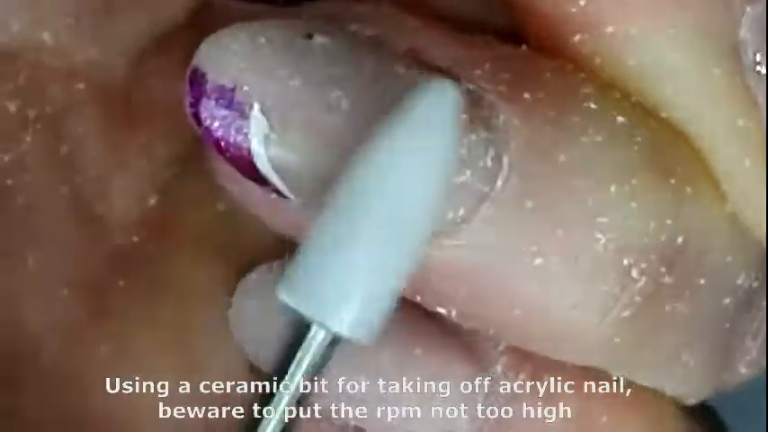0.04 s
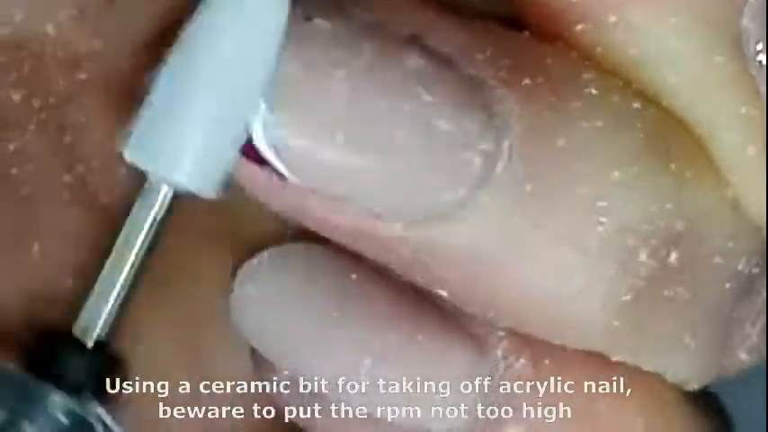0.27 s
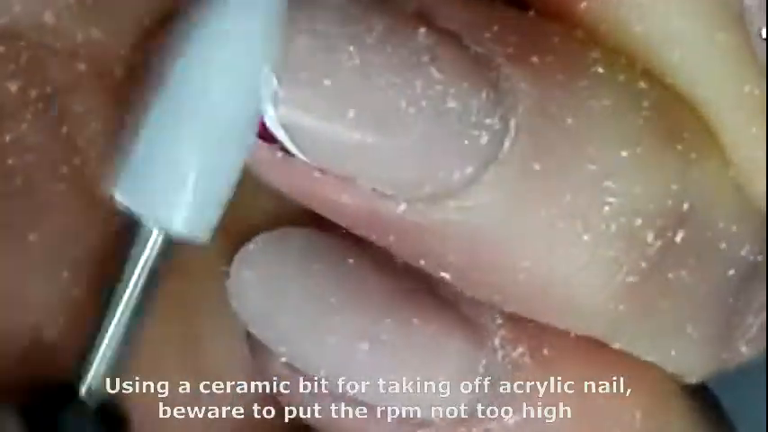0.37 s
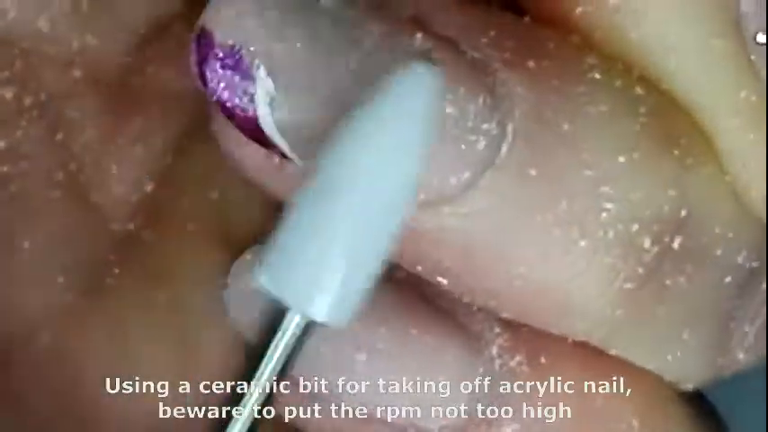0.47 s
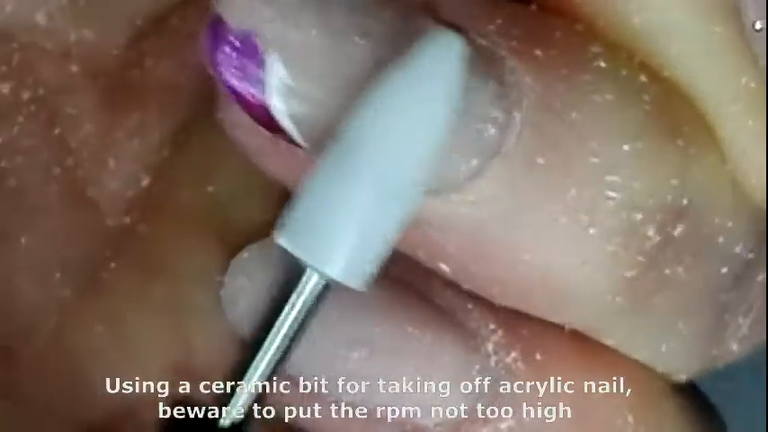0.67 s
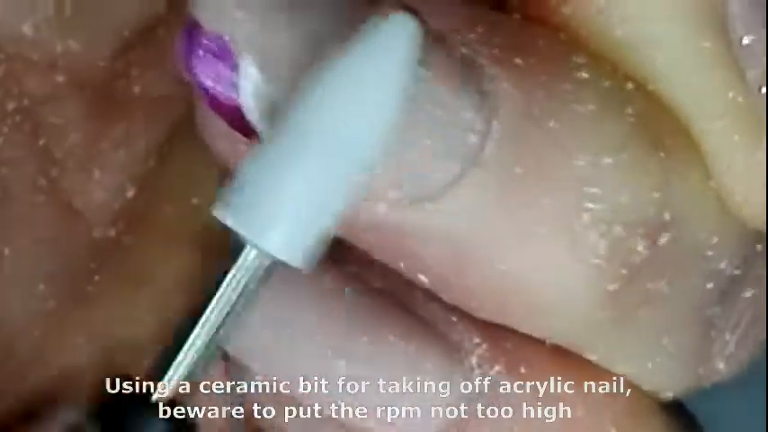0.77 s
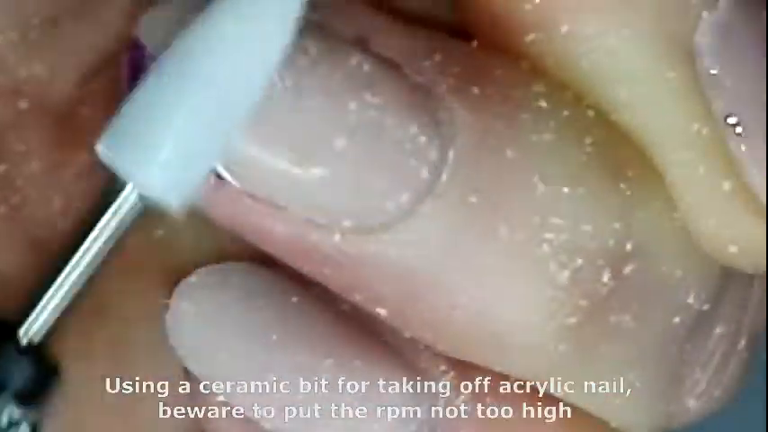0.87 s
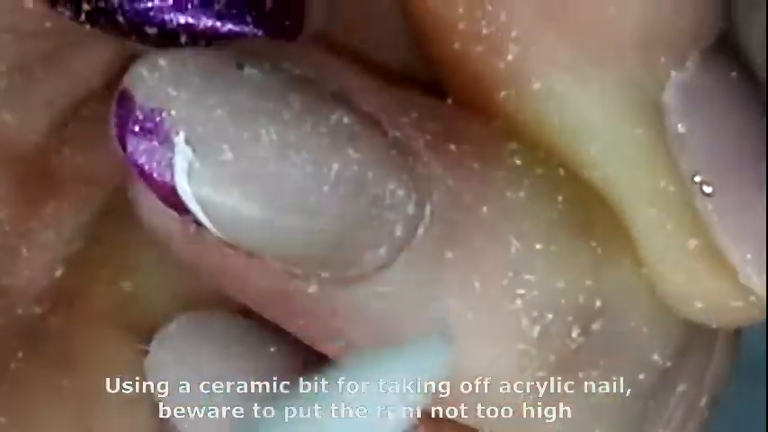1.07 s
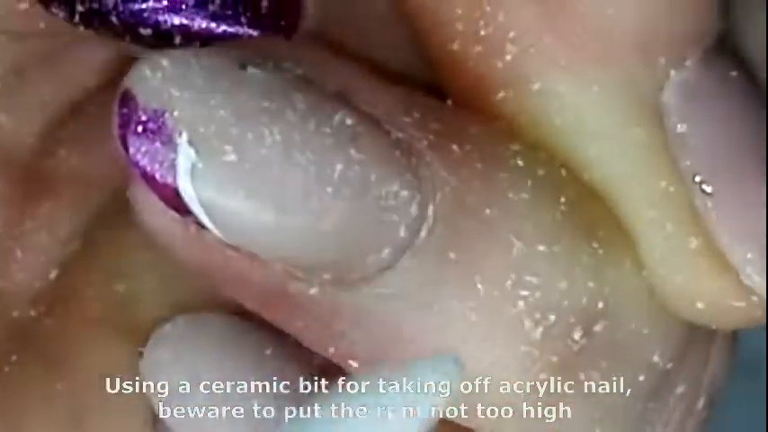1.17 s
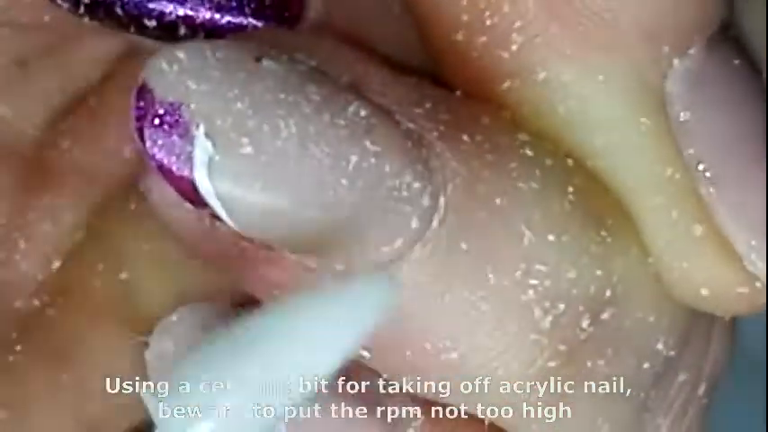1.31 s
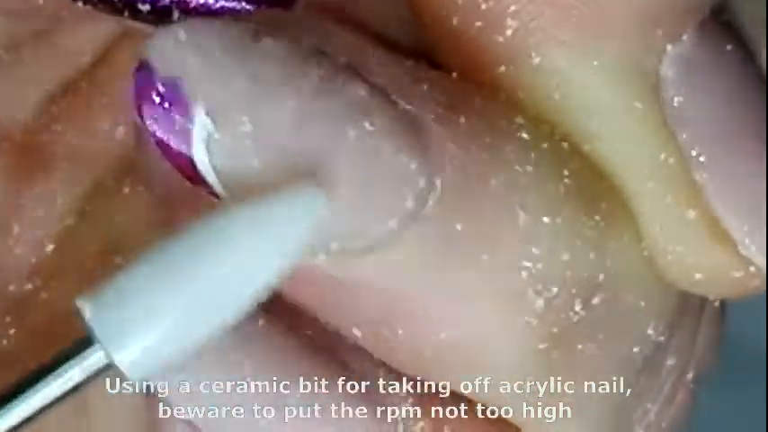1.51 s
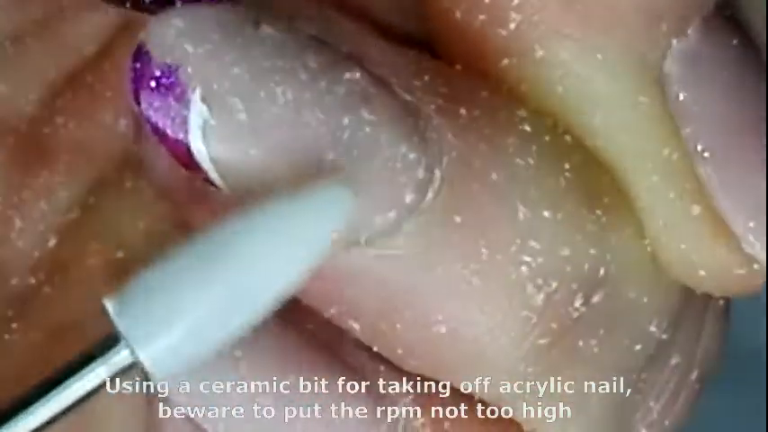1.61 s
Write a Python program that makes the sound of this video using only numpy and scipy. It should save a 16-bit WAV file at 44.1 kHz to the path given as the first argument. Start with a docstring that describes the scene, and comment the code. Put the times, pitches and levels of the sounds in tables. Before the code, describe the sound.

A small electric nail drill hums and whines throughout in a quiet room. From about 0.25 to 0.45 seconds its bit grinds an acrylic nail with a louder, chattering rasp and fine hiss, and the motor's pitch sags, then recovers. It grinds and slows again from 0.8 to 1.1 seconds. The motor speeds back up, and a third touch begins at about 1.6 seconds.

```python
"""A small electric nail drill grinds an acrylic nail. Twice its grooved bit is pressed on: it skips once
a turn, bites and rasps, dust hisses off, and the speed sags under the load. At the end a third touch
begins. All along the motor hums, and its brushes and bearings rattle and whine in step with the shaft.
Behind it a quiet room rumbles."""
import sys
import numpy as np
from scipy import signal
from scipy.fft import rfft, irfft
from scipy.io import wavfile
from scipy.ndimage import uniform_filter1d

SR = 44100
rng = np.random.default_rng(int(sys.argv[2]) if len(sys.argv) > 2 else 0)


def store_pcm(level_fs):
    """Save levels as 16-bit WAV."""
    pcm = np.round(np.clip(level_fs, -1, 1) * 32767).astype(np.int16)
    wavfile.write(sys.argv[1], SR, np.atleast_2d(pcm).T)


N = 72765
T = np.arange(N) / SR


def undb(db):
    """Turn decibels into a gain."""
    return 10 ** (np.asarray(db) / 20)


def unit(x):
    """Scale to an average (rms) level of 1."""
    return x / np.sqrt(np.mean(x ** 2))


def curve(table, column=1):
    """One column of a table, joined by straight lines in time."""
    rows = np.array(table, float)
    return np.interp(T, rows[:, 0], rows[:, column])


def gains(points, size):
    """Gain at each frequency, from rows of pitch_hz, level_db."""
    hz, db = np.array(points, float).T
    return undb(np.interp(np.log(np.fft.rfftfreq(size, 1 / SR) + 1), np.log(hz), np.log(1) + db))


def colour(x, points, size=2048):
    """Ring a body with the given tone colour; the ring follows each click, so clicks stay sharp."""
    cepstrum = irfft(np.log(gains(points, size)))
    cepstrum[1:size // 2] *= 2
    cepstrum[size // 2 + 1:] = 0
    ring = irfft(np.exp(rfft(cepstrum)))
    return unit(signal.fftconvolve(x, ring)[:N])


def drift(per_s):
    """A smooth random wander, about 1 in size."""
    hold = int(SR / per_s)
    steps = np.repeat(rng.standard_normal(N // hold + 1), hold)
    return unit(uniform_filter1d(steps, hold)[:N])


def ticks(turns, per_turn, uneven, pattern_db, scatter_db, jitter_s, size=8):
    """Clicks in a pattern that repeats every turn; uneven shifts them by a share of their gap."""
    k = np.arange(int(turns[-1] * per_turn))
    place, strength = rng.standard_normal((per_turn, 2))[k % per_turn].T
    late, louder = rng.standard_normal((N // 10, 2))[k].T
    at = (np.interp((k + 1 + uneven * place) / per_turn, turns, T) + jitter_s * late) * SR
    index = at.astype(int)[:, None] + np.arange(1 - size, size + 1)
    offset = index - at[:, None]
    shape = np.sinc(offset) * np.cos(np.pi * offset / (2 * size)) ** 2  # a click between samples
    clicks = shape * undb(pattern_db * strength + scatter_db * louder)[:, None]
    out = np.bincount(index.ravel() % N, clicks.ravel(), N)
    return unit(out - out.mean())


def grit(per_s, spread_db):
    """Dense random clicks of uneven size."""
    clicks = (rng.random(N) < per_s / SR) * rng.choice([-1, 1], N)
    return unit(clicks * undb(spread_db * rng.standard_normal(N)))


def once_a_turn(turns, depth_db):
    """A swell at each whole turn, as the shaft spins slightly off centre."""
    depth = np.log(undb(depth_db))
    return np.exp(depth * np.cos(2 * np.pi * turns) / 2) / np.sqrt(np.i0(depth))


def tones(turns, table, waver, per_s):
    """Pure tones on multiples of the shaft speed, wavering in level."""
    out = np.zeros(N)
    for multiple, db in table:
        level = undb(db) * (1 + waver * drift(per_s))
        out += level * np.sin(2 * np.pi * (multiple * turns + rng.random()))
    return np.sqrt(2) * out


def room_rumble():
    """The quiet room: low noise that gently swells and fades."""
    # tone colour of the rumble: pitch_hz, level_db
    rumble_colour = [(22, -3), (40, 9), (65, -12), (130, -13), (250, -16), (450, -23.5), (2000, -41)]
    return undb(-67.5 + 3 * drift(12.5)) * colour(rng.standard_normal(N), rumble_colour)


def bearing_whine(turns):
    """Bearing tones follow the shaft, each wandering a little as the balls slip."""
    # tones of the bearings: multiple_of_shaft_speed, level_db
    whine_tones = [(31, -7), (32, 0.5), (33, -7), (40, -2), (41, 1), (42, 1.5), (43, -15), (48, -4),
                   (49, -17), (50, 1.5), (51, -7)]
    out = np.zeros(N)
    for multiple, db in whine_tones:
        level = undb(db) * (1 + .96 * drift(49.56))
        out += level * np.sin(2 * np.pi * (multiple * turns + .33 * drift(45)))
    return out


def motor(turns):
    """Brush ticks, bearing grit and bearing whine ring the drill's handle over the motor's hum."""
    # tone colour of the handle held upright, then tilted: pitch_hz, level_db
    upright_colour = [(150, -19.5), (330, -26), (450, -58), (600, -34), (900, -23.5), (1600, -8.5),
                      (2400, -6), (3200, -1), (3650, -7.5), (4400, -1.5), (4700, -0.5), (5150, 2.5),
                      (5750, -9), (6200, -6), (7200, -6.5), (8500, -14), (9800, -10.5), (11500, -25),
                      (14500, -25.5)]
    tilted_colour = [(150, -26), (350, -22), (650, -26), (1000, -16), (1400, -9), (1950, -0.5),
                     (2300, -2.5), (3000, 1.5), (3800, -4), (4450, -1.5), (5000, -2), (5370, 5),
                     (5750, -10.5), (6200, -10.5), (7200, -8.5), (8500, -12.5), (9300, -16.5), (10100, -13),
                     (11500, -24), (14500, -22.5)]
    # loudness of the rattle: time_s, level_db
    rattle_level = [(0, -40.5), (.12, -39.5), (.24, -38.5), (.47, -42), (.6, -39), (.76, -40), (1.12, -42),
                    (1.25, -41.5), (1.4, -41.5), (1.65, -39.5)]
    # tones of the hum: multiple_of_shaft_speed, level_db
    hum_tones = [(1, -68.5), (2, -71.5), (3, -75), (4, -86), (5, -83), (7, -81), (8, -75.5), (9, -70),
                 (10, -76), (11, -72.5), (14, -66.5), (15, -70), (17, -73)]
    brushes = ticks(turns, per_turn=23, uneven=.448, pattern_db=4.5, scatter_db=2.5, jitter_s=.00002)
    clatter = brushes + undb(2.5) * grit(per_s=6000, spread_db=.5)
    whine = bearing_whine(turns)
    wobble = once_a_turn(turns - .35, depth_db=6)
    upright = colour((clatter + undb(-14) * whine) * wobble, upright_colour)
    tilted = colour((clatter + undb(-20.5) * whine) * wobble, tilted_colour)
    tilt_middle_s, tilt_takes_s = .96, .18
    tilt = np.clip((T - tilt_middle_s) / tilt_takes_s + .5, 0, 1)
    rattle = np.sqrt(1 - tilt) * upright + np.sqrt(tilt) * tilted
    return rattle * undb(curve(rattle_level)) + tones(turns, hum_tones, waver=.23, per_s=14.92)


def turns_on_nail(turns, early_s, last_s):
    """Turns counted from the point of contact, which creeps round the bit between two catches."""
    start, end = np.interp([early_s, last_s], T, turns)
    return (turns - start) * round(end - start) / (end - start)


def nail_rasp(turns):
    """The bit's cutting edges strike the nail, chip it and make it ring."""
    # overtones of the unevenly cutting bit: multiple_of_shaft_speed, level_db
    bit_tones = [(3, -7), (8, -5), (11, -11), (13, -7.5), (16, -4.5), (20, -3.5), (24, -10.5), (28, -9.5),
                 (32, -11)]
    # tone colour of the rasp: pitch_hz, level_db
    rasp_colour = [(100, -34.5), (320, -23), (500, -38.5), (750, -26), (1200, -9.5), (1700, -9.5),
                   (2300, -9.5), (2850, -5), (3500, -7), (4500, -8.5), (5100, 1), (5550, 1), (6300, -2),
                   (7000, -8), (8200, -18.5), (10000, -23), (14500, -43)]
    edges, ring_hz, ring_width_hz = 12, 5410, 120
    strikes = ticks(turns, per_turn=edges, uneven=.044, pattern_db=1.2, scatter_db=0, jitter_s=.00004)
    buzz = undb(-10.5) * tones(turns, bit_tones, waver=.33, per_s=90)
    note = undb(-13) * np.sqrt(2) * np.cos(2 * np.pi * edges * turns)
    chips = undb(2.5) * grit(per_s=7000, spread_db=2)
    cuts = strikes + note + buzz + chips
    ring = signal.lfilter(*signal.iirpeak(ring_hz, ring_hz / ring_width_hz, fs=SR), cuts)
    return unit(colour(cuts, rasp_colour) + undb(-9) * unit(ring))


def grinding(turns):
    """While the bit touches, the nail rasps and fine dust hisses off, hardest once a turn."""
    # tone colour of the dust's hiss: pitch_hz, level_db
    dust_colour = [(3000, -24), (8300, -9), (10200, 6), (11800, -1.5), (13000, 1), (15000, -20)]
    # the three touches of bit on nail: time_s, rasp_db, dust_db, skip_depth_db
    first = [(.238, -46, -63, 23), (.253, -27.5, -40.5, 20), (.312, -23, -38.5, 8.5),
             (.345, -25.5, -40.5, 3.5), (.385, -27, -36.5, -1), (.405, -34, -42, 4), (.432, -30, -41.5, -5),
             (.446, -43.5, -49, 31), (.456, -65, -65, 20)]
    second = [(.76, -50, -70, 13), (.775, -33, -53, 11), (.83, -27, -42, 8.5), (.868, -25.5, -42, 3.9),
              (.912, -25, -39, 2.7), (.975, -29, -40, 5.3), (1.012, -32, -38.5, 3.3),
              (1.056, -28.5, -46.5, 9.3), (1.08, -35, -56, 12), (1.088, -35, -56, 20),
              (1.098, -62, -82, 18)]
    third = [(1.605, -68, -72, 12), (1.63, -49, -56, 6.9), (1.66, -27, -58, 4.9)]
    # when the bit's high spot catches in each touch: an early catch and the last one
    early_catches_s, last_catches_s = (.2705, .829, 1.636), (.444, 1.088, 1.645)
    rasp = nail_rasp(turns)
    dust = colour(grit(per_s=7000, spread_db=4), dust_colour)
    out = np.zeros(N)
    for touch, early_s, last_s in zip((first, second, third), early_catches_s, last_catches_s):
        touching = (T > touch[0][0]) & (T < touch[-1][0])
        rasp_db, dust_db, skip_depth_db = (curve(touch, column) for column in (1, 2, 3))
        skip = once_a_turn(turns_on_nail(turns, early_s, last_s), skip_depth_db)
        out += touching * skip * (rasp * undb(rasp_db) + dust * undb(dust_db))
    return out


def scene():
    """One shaft drives motor and bit in a quiet room; the treble's fine grain differs left and right."""
    # shaft speed, sagging under load and recovering as the bit lifts: time_s, turns_per_s
    shaft_speed = [(0, 94), (.1, 101), (.22, 107), (.255, 109), (.3, 99), (.35, 83), (.4, 74), (.44, 74),
                   (.5, 86), (.58, 97), (.67, 104), (.77, 109), (.82, 103), (.87, 92), (.93, 78), (.98, 69),
                   (1.05, 68), (1.11, 74), (1.2, 91), (1.3, 102), (1.42, 108), (1.55, 111), (1.65, 112)]
    # stereo width, the side signal's level against the middle's: pitch_hz, level_db
    stereo_width = [(2800, -72), (3800, -64), (5200, -28), (7000, -8), (12000, -7)]
    turns = np.cumsum(curve(shaft_speed)) / SR
    mid, side = (motor(turns) + grinding(turns) for _ in range(2))
    side = irfft(rfft(side) * gains(stereo_width, N), N)
    return np.array([mid + side, mid - side]) + room_rumble()


def record(dry):
    """Cut away the highest treble."""
    top_hz = 14400
    return signal.sosfilt(signal.ellip(10, .2, 80, top_hz, fs=SR, output="sos"), dry)


dry = scene()
out = record(dry)
store_pcm(out)
```